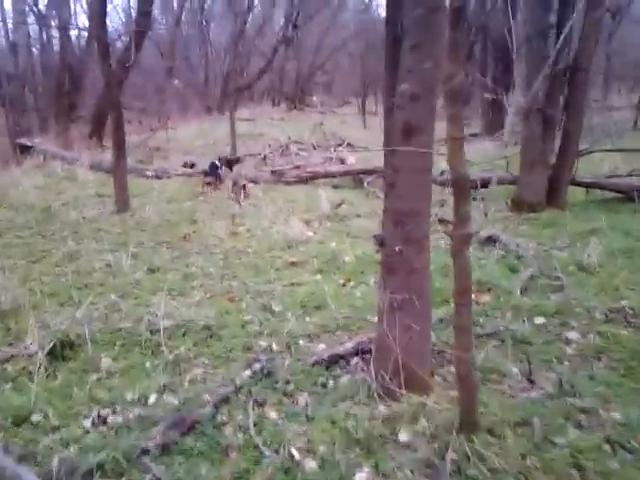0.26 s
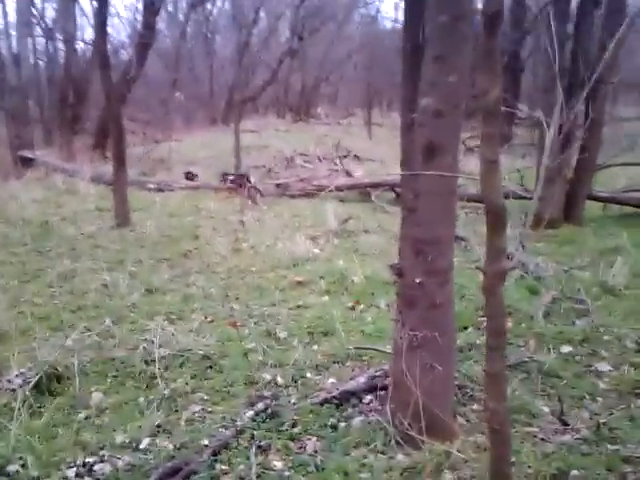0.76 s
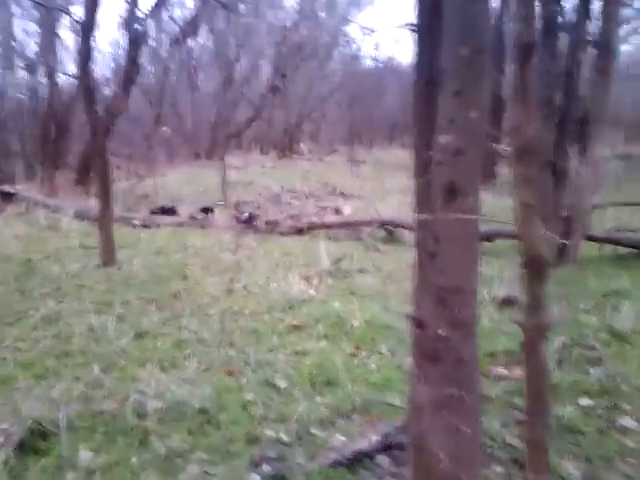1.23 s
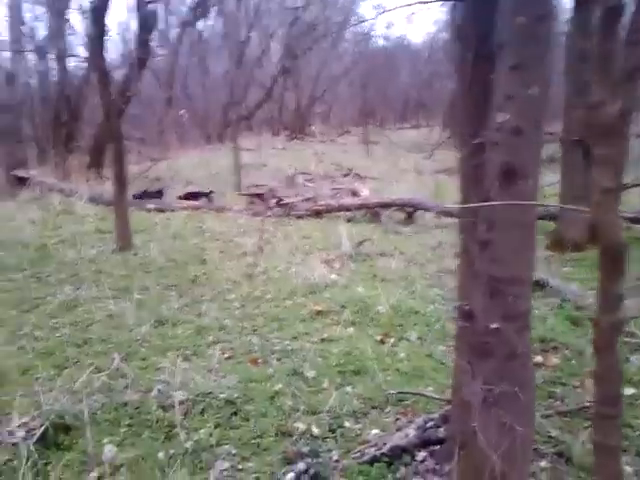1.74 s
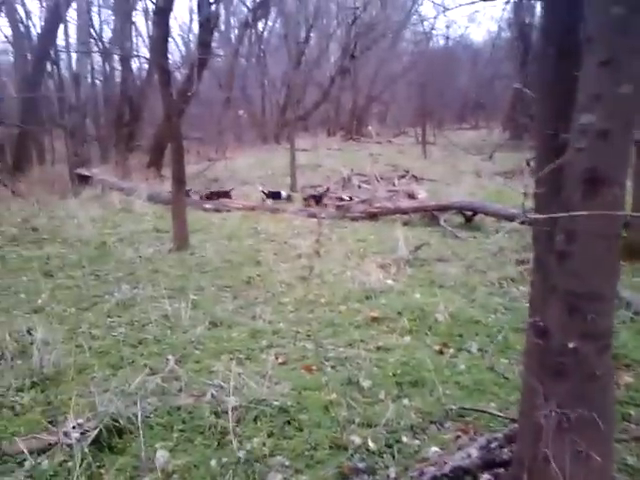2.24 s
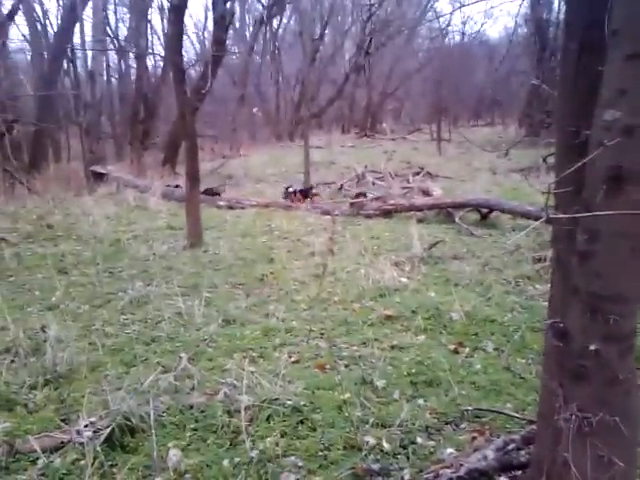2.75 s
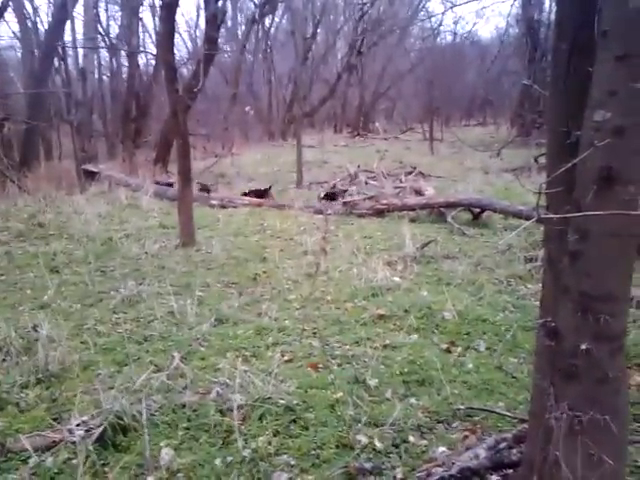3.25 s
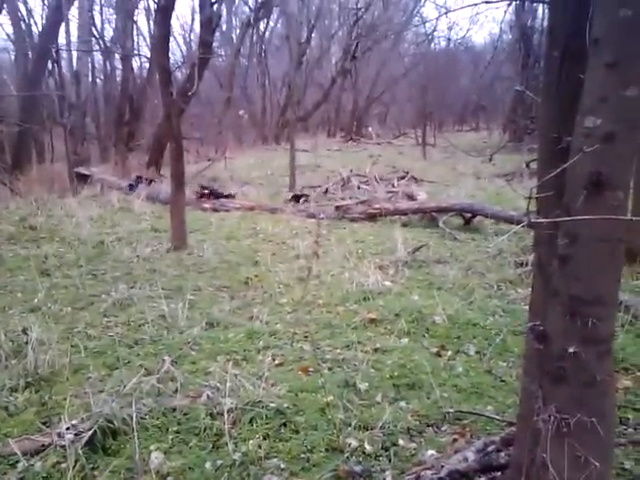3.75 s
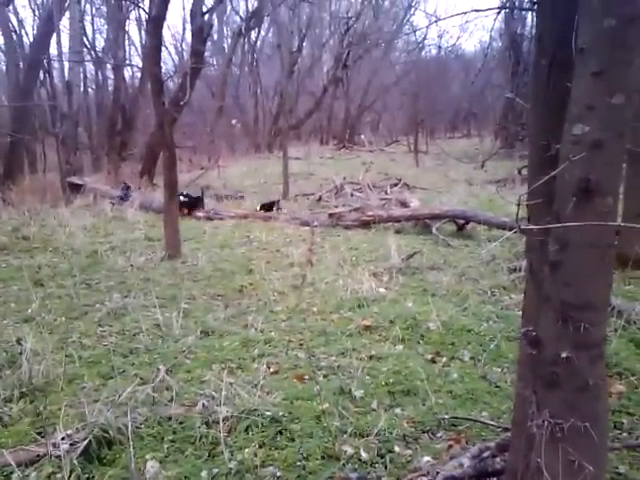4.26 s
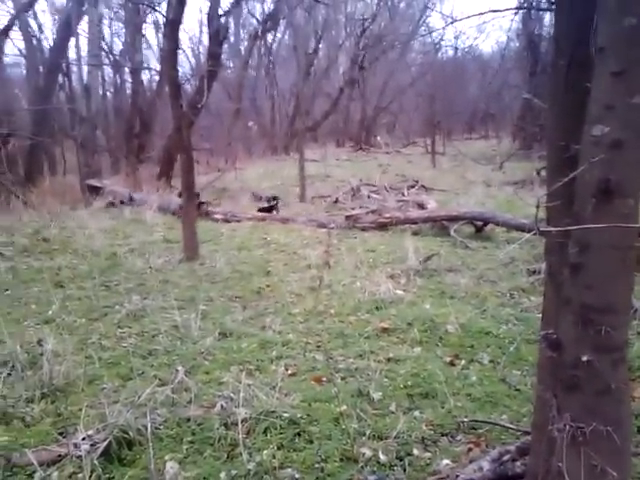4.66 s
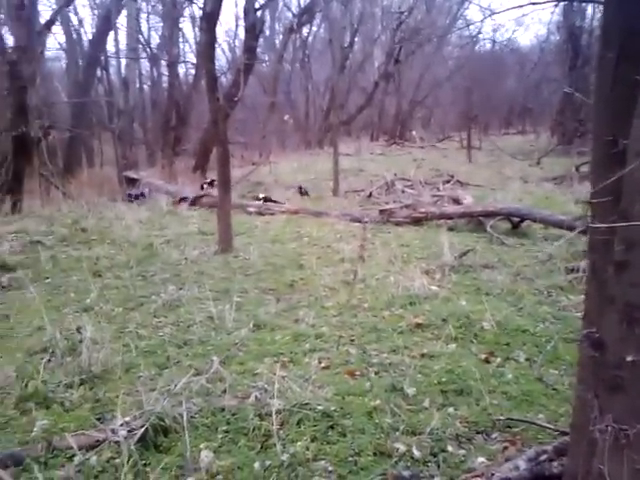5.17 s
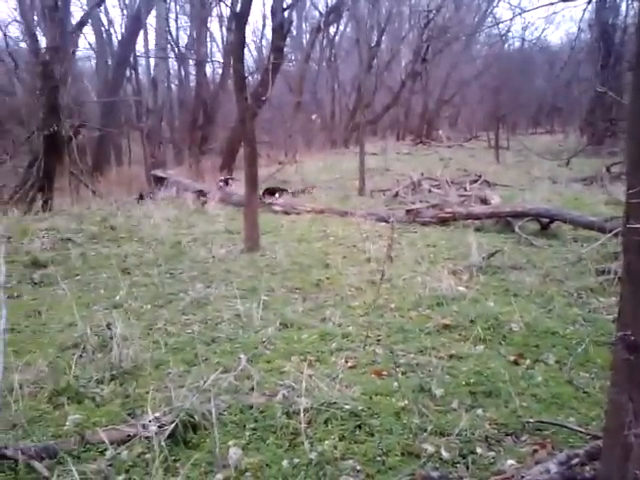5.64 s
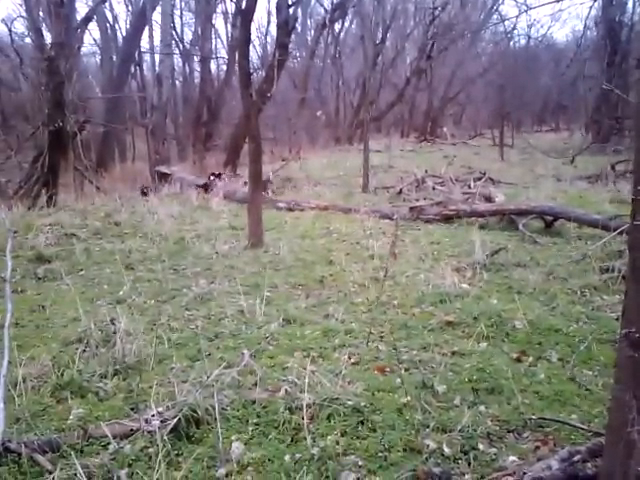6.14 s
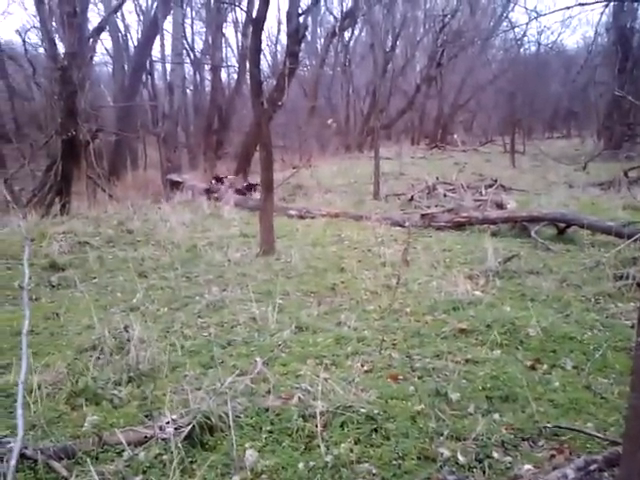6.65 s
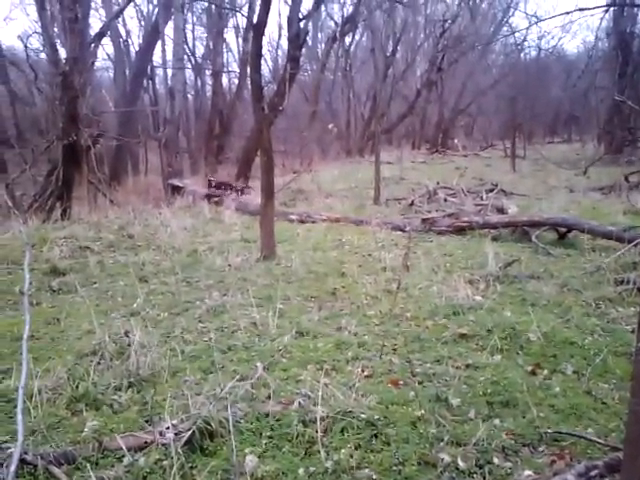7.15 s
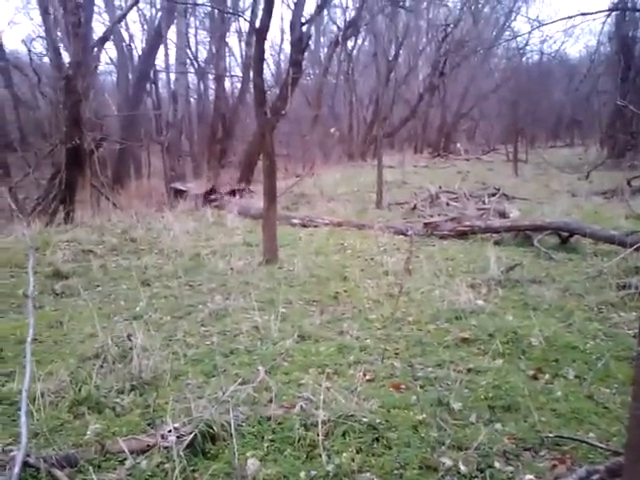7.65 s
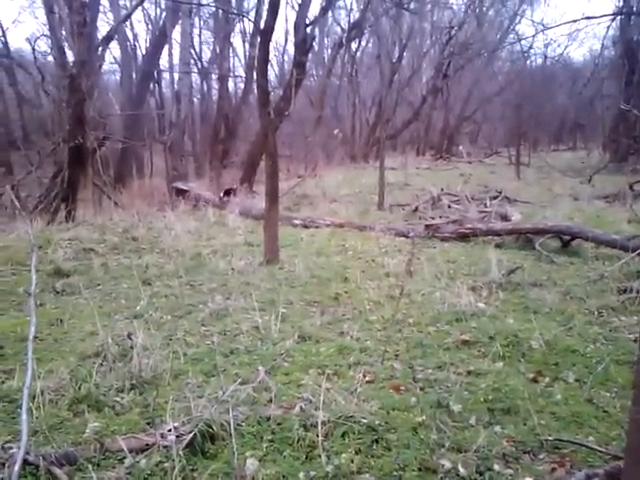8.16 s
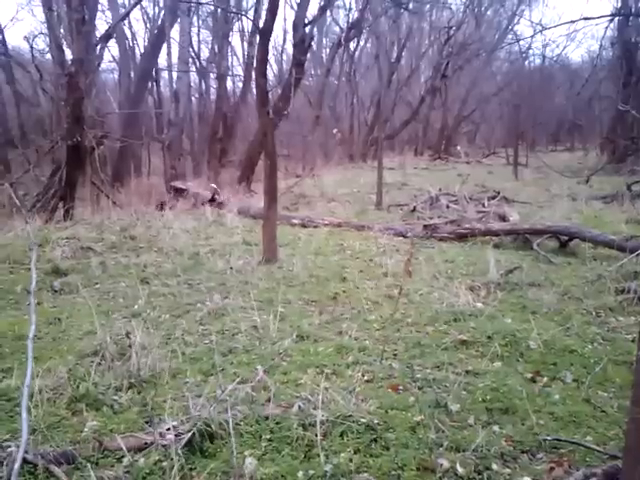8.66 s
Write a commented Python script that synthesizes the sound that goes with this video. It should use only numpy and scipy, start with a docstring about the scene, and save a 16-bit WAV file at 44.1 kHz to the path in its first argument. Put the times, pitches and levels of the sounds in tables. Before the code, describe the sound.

A pack of hounds calls some way off among bare trees. Yelps begin as clear high notes and crack into rasping barks, with brief squeals on top. It starts crowded, thins to separate barks, stretches into two drawn-out hoarse bays, then swells into the loudest volleys before thinning out and stopping. Faint wind rumble, slight leaf crackle and soft woodland echoes lie behind, on a simple, dull outdoor microphone.

```python
"""Open woodland, a pack of hounds giving tongue some way off.
Yelps start as clear harmonic notes and break into hoarse barks: uneven pulses and noise through resonances,
with wavering pitched cores. Squeals and long bays overlap them; noise echoes off trunks add a tail.
Behind: faint air, low rumble, crackling leaves. A microphone with little treble overloads on the loudest barks."""
import sys
import numpy as np
from scipy import signal
from scipy.fft import rfft, irfft
from scipy.io import wavfile

SR = 44100
rng = np.random.default_rng(int(sys.argv[2]) if len(sys.argv) > 2 else 0)


def materialize(psi):
    """Save the field psi as 16-bit PCM at rate SR to the path in sys.argv[1].

    A 1-D psi becomes a single channel; in a 2-D psi each row is a channel.
    """
    bounded = np.clip(np.atleast_2d(psi).T, -1, 1)
    quanta = np.round(bounded * 32767).astype(np.int16)
    wavfile.write(sys.argv[1], SR, quanta)


N = 392490

# Moving air on the microphone: t/s, level/dB (before RUMBLE_GAIN_DB)
RUMBLE_LEVELS = [(0.0, -50.5), (0.57, -47), (1.38, -54.5), (1.81, -45.5), (2.38, -67), (2.68, -59),
                 (5.06, -53), (6.64, -65), (6.79, -55), (7.09, -58), (8.9, -72.5)]
RUMBLE_GAIN_DB = -4
# Steady air, spectrum shape: f/Hz, relative density/dB per Hz
AIR_SPECTRUM = [(15, -29), (25, -19.5), (80, -7.5), (200, -7.5), (400, -12), (900, -10), (2000, -20.5),
                (4000, -24), (6500, -23.5), (7200, -11.5), (7800, -38.5)]
AIR_LEVEL_DB = -49.5
# Dry leaves stirred nearby: start t/s, length/s, level/dB (before LEAVES_GAIN_DB)
LEAF_SWELLS = [(0.0, .3, -48), (1.57, 0.25, -47)]
LEAVES_GAIN_DB, CRACKLES_PER_S = 5, 2500
# Tail scattered by the trunks: f/Hz, t60/s
TRUNK_DECAY = [(400, 1.3), (900, 1.26), (1500, 1.325), (3000, 0.92), (6000, 2.19)]
FIRST_TRUNK_S, TAIL_GAIN_DB = 0.028, -17.5

# Call times: swell/s, dying/s, scoop below the first pitch/%, fall below the last pitch/%
BAY_TIMES = (.045, .03, 5, 0)
SQUEAL_TIMES = (0.02, 0.028, 0.72, 0)
CORE_TIMES = (.02, .03, .3, .3)
YELP_SWELL_S, YELP_FALL_PERCENT = 0.013, 1.2
# Call shapes, a row per corner (start, swelled, hold end, end):
# 1st harmonic offset/dB, then extra drop of each higher harmonic below the 1st/dB
BAY_SHAPE = [(-19.5, -2.5, -8.5, -12.5), (2.5, 1.5, -4, -5.5), (-1, -1, 6.5, 6.5), (-10.5, -3, 4, 5.5)]
SQUEAL_SHAPE = [(-10.5, 4, 13), (-0.46, .3, -1), (0, 2.5, 10), (-12, 15, 30)]
YELP_SHAPE = [(-27, 17, 16, 10.5), (0, 16.5, 7, -5.5), (0, 0.5, -1, 0), (-9, 6, 8, 14)]
# Core edges: level at start/dB, at end/dB, relative to the hold
CORE_EDGES = (-7, -8)

# Levels and drops below are offset by the shapes above.
# Long bays: start t/s, length/s, from f/Hz, to f/Hz, last f/Hz, level/dB,
# 2nd, 3rd, 4th harmonic drop below the 1st/dB
BAY_CALLS = [ (0.07, 0.15, 528.4, 552, 540, -23.5, 14, 26.5, 28.5),
             (0.2, 0.15, 544, 527, 512, -25, 11.5, 34, 33.5),
             (0.386, 0.12, 584, 547, 545, -16, 12.5, 24.5, 29),
             (0.498, 0.12, 536.5, 535, 540, -27.5, -1.5, 15.5, 11.5),
             (0.597, .135, 571.3, 593, 603, -17.5, 13, 21, 33),
             (0.992, 0.13, 509, 587, 546, -52, -35, -8, -18.5),
             (4.305, 0.47, 588.2, 524.4, 505, -30, -9, -3, 4),
             (5.041, 0.42, 564.5, 510, 510, -33.5, -15, -4.5, 3), ]
# Squeals: start t/s, length/s, from f/Hz, to f/Hz, last f/Hz, level/dB, 2nd, 3rd harmonic drop/dB
SQUEAL_CALLS = [ (0.816, 0.059, 1365, 1393, 1396, -18.5, 7.3, 20),
                (1.325, .11, 1511, 1581, 1170, -13, 17, 27.5),
                (1.882, 0.07, 1305, 1323, 1260, -15.5, 22, 30.5),
                (2.644, 0.13, 1371, 1404, 1520, -22, 18, 36), (3.263, 0.12, 1349, 1288, 1187, -23, 12, 42),
                (3.732, .11, 1393, 1411, 1474, -23, 9, 18.5),
                (5.475, 0.14, 1568, 1545, 1420, -22, 34, 45.5),
                (5.966, 0.12, 1395, 1407, 1350, -14, 10.3, 29.5),
                (6.06, 0.12, 1372, 1401, 1472, -11.5, 8.9, 23.5),
                (6.163, .075, 1455, 1464, 1410, -16, 17, 33), (6.437, .06, 1395, 1430, 1410, -22, 3, 17),
                (7.01, 0.08, 1440, 1507, 1480, -13.5, 22, 46.5),
                (7.12, 0.059, 1495, 1480, 1160, -11.5, 17, 38),
                (7.67, 0.073, 1414, 1395, 1440, -19, 14, 20.5), ]
# Clear starts of yelps: dying/s, scoop/%, swell short by/dB, start t/s, length/s, from f/Hz, to f/Hz,
# level/dB, 2nd, 3rd, 4th harmonic drop/dB
YELP_CALLS = [ (0.028, 3.5, 1.5, 0.662, 0.049, 892, 902, -13.5, 10.5, 12, 26.5),
              (0.016, 3, 3, 1.173, 0.042, 877, 933, -9, 8.5, 10.14, 25),
              (0.038, 1, 4, 1.753, 0.078, 838, 819, -13.5, 19, 13.5, 34.5),
              (.024, -3, -4, 2.305, 0.036, 840, 768, -35.5, 25, 35, 43.5),
              (.014, -1.5, 2.5, 2.555, 0.045, 917, 910, -11, 15, 15.7, 37.5),
              (.014, 0, 3.5, 3.189, 0.044, 870, 910, -14.5, 10, 12, 29),
              (0.013, 5, 5.5, 3.58, 0.045, 830, 888, -16, 13.5, 18, 36.5),
              (.011, 3, -1.5, 5.808, .03, 850, 866, -19, -5, 4.4, 16.5),
              (0.014, 2.5, 6, 7.55, 0.047, 847, 909, -12, 7, 12, 18),
              (0.044, 5, 2, 8.041, 0.072, 890, 917, -21.5, 40, 25.6, 25.5), ]
# Pitched cores of the barks: start t/s, length/s, from f/Hz, to f/Hz, early level/dB, late level/dB
BARK_CORES = [ (0.358, .05, 698, 687, -25, -29), (0.479, .14, 632, 701, -23, -19),
              (0.72, 0.17, 865, 850.7, -28, -24), (1.208, .132, 937, 946, -13.5, -21),
              (1.825, .145, 805, 798, -17, -28), (2.598, 0.09, 869, 847, -20, -21),
              (2.623, 0.12, 688, 690, -29, -28.5), (3.224, .116, 852, 851, -18, -24),
              (3.654, 0.15, 683.3, 692.5, -30, -29), (3.638, 0.14, 826, 864, -25.5, -22.5),
              (4.559, .25, 744.3, 750, -24, -19), (5.051, 0.11, 734, 702, -20.5, -21),
              (5.23, .2, 727, 736, -25, -17), (5.425, .135, 1045, 1028, -17, -21),
              (5.84, .16, 880, 867, -15.5, -18), (5.855, .175, 713, 693, -19.5, -23),
              (6.394, .12, 664.5, 688, -24, -14), (6.485, .155, 862, 852.6, -14, -15),
              (6.535, .125, 1112, 1068, -15, -16), (6.951, 0.13, 705, 688, -28, -9.5),
              (7.045, .085, 1078, 1094, -12, -12.5), (7.58, .18, 890, 877.6, -11, -16),
              (7.595, .105, 1172, 1144, -20.5, -29), ]

# Hoarse barks: start t/s, peak after/s, length/s, first burst, peak, late level/dB (before BARK_GAIN_DB),
# open mouth at start, end/dB, snarl at start, end/dB
HOARSE_BARKS = [ (0, 0.04, 0.4, -25.5, -23.5, -28, -9.5, -15.5, -13.5, -23),
                (0.346, .075, .15, -20, -12.5, -16, -2.5, -12, -5.5, -27.5),
                (0.47, .09, 0.24, -20.5, -19, -16, -13.5, -6.5, -24.5, -19),
                (0.66, .06, 0.24, -12, -11.5, -12, -18.5, -9, -14.5, -14.5),
                (0.86, .1, 0.28, -17, -16.5, -17.5, -13.5, -1.5, -17.5, -14),
                (1.199, 0.12, 0.2, -16.5, -13, -15, -1.5, -2.2, -3, -7.5),
                (1.79, 0.12, 0.23, -17.5, -21.5, -20.5, -8, 3.7, -12, -4.5),
                (2.588, 0.13, 0.21, -20, -18, -21, -3.5, 4, -1.5, -8.5),
                (3.22, 0.087, 0.19, -19.5, -19.5, -21, -7, 2.5, 1.5, -5),
                (3.618, 0.081, 0.23, -17.5, -19.5, -22, -19.5, 4, -8, -8.5),
                (4.301, 0.073, 0.55, -18.5, -15, -17.5, 0.5, -5, -8, -22),
                (5.036, 0.078, 0.46, -15.5, -14, -18.5, 0.1, -7, -13, -26),
                (5.398, 0.11, 0.23, -13.5, -8, -13.5, -2, -3, 0.5, -21),
                (5.815, 0.097, 0.4, -10.5, -5.5, -13.5, -3, -3, -7, -20.5),
                (6.402, .14, .34, -14.5, -5, -9, 0.5, -5.5, -11, -18.5),
                (6.947, 0.16, .27, -11.5, -4.5, -9, -0.9, -7.5, -9.5, -15.5),
                (7.568, 0.1, 0.22, -13, -10.5, -13, 3, -2.5, -3, -18.5), ]
BARK_GAIN_DB, BREATH_DB = -4, -34
BARK_BURST_S, BARK_DYING_S = 0.036, 0.1
BARK_START_DB, BARK_END_DB = -9, -9   # relative to the first burst; to the late level
# Resonances of throat, open mouth, snarl, breath: f/Hz, single-pass width/Hz, level/dB
THROAT_MODES = [(356, 570, -23.5), (650, 240, 4), (908.4, 320, 9.5)]
MOUTH_MODES = [(1109, 418, 8.5), (1476, 544, 8.5)]
SNARL_MODES = [(2205, 740, 5), (2910, 250, -0.5), (3183, 210, -5.5), (3583, 224, -12.5)]
BREATH_MODES = [(4300, 200, -31.5), (6200, 2700, -35.5)]

MIC_TOP_HZ, CUTOFF_HZ = 8250, 15800
MIC_OFFSET = 0.0024   # full scale = 1


def from_db(db):
    """Decibels to amplitude gain."""
    return 10 ** (np.asarray(db) / 20)


def rms_one(x):
    """Scale to unit rms."""
    return x / np.sqrt(np.mean(x ** 2) + 1e-20)


def at_hz(points, hz):
    """Read a spectrum table on a log-frequency axis."""
    table_hz, values = np.transpose(points)
    return np.interp(np.log(hz), np.log(table_hz), values)


def band_noise(x, order, low_hz, high_hz):
    """Band-pass x (Butterworth)."""
    sos = signal.butter(order, [low_hz, high_hz], "band", fs=SR, output="sos")
    return signal.sosfilt(sos, x)


def drift(rate_hz):
    """Slow chance: noise twice through a one-pole low-pass, rms 1."""
    r = np.exp(-2 * np.pi * rate_hz / SR)
    settle = 4000
    noise = rng.standard_normal(N + settle)
    return rms_one(signal.lfilter([1], [1, -2 * r, r * r], noise)[settle:])


def span(rows, attack_s, release_s):
    """Sample range of corner rows, a fade at both ends, and the columns at sample rate."""
    s, *columns = np.transpose(rows)
    first, last = round(s[0] * SR), min(round(s[-1] * SR), N)
    t = np.arange(first, last) / SR
    fade = np.clip(np.minimum((t - s[0]) / attack_s, (s[-1] - t) / release_s), 0, 1)
    return slice(first, last), fade, [np.interp(t, s, c) for c in columns]


def rumble():
    """Lumpy low noise from moving air."""
    low = rms_one(band_noise(rng.standard_normal(N), 2, 30, 200))
    s, level_db = np.transpose(RUMBLE_LEVELS)
    level_db = np.interp(np.arange(N) / SR, s, level_db)
    lumps_db = 3 * drift(2.4)
    return from_db(level_db + RUMBLE_GAIN_DB + lumps_db) * low


def air():
    """Far, steady air and microphone hiss: noise shaped in the spectrum."""
    hz = np.maximum(np.fft.rfftfreq(N, 1 / SR), 10)
    spectrum = rfft(rng.standard_normal(N)) * from_db(at_hz(AIR_SPECTRUM, hz))
    return from_db(AIR_LEVEL_DB) * rms_one(irfft(spectrum, N))


def leaves():
    """Dense small crackles, broad and bright: random impulses in soft swells."""
    grains = (rng.random(N) < CRACKLES_PER_S / SR) * rng.standard_normal(N)
    grains = rms_one(band_noise(grains, 1, 250, 6000))
    t = np.arange(N) / SR
    swells = np.zeros(N)
    for start, length, level_db in LEAF_SWELLS:
        arch = np.sin(np.pi * np.clip((t - start) / length, 0, 1)) ** 2
        swells += from_db(level_db + LEAVES_GAIN_DB) * arch
    return grains * swells


def woodland(x):
    """Countless weak echoes off trunks: noise that swells after the first trunk and dies band by band."""
    t = np.arange(2 * SR) / SR
    edges_hz = 280 * 2 ** np.arange(0, 5, .5)
    echoes = np.zeros(len(t))
    for low, high in zip(edges_hz, edges_hz[1:]):
        band = band_noise(rng.standard_normal(len(t)), 2, low, high)
        echoes += band * from_db(-60 * t / at_hz(TRUNK_DECAY, np.sqrt(low * high)))
    echoes *= np.clip(t / FIRST_TRUNK_S - 1, 0, 1)
    # normalise the echo energy for the band covered
    energy = np.sum(echoes ** 2) * np.mean(edges_hz[[0, -1]]) * 4 / SR
    return signal.fftconvolve(x, .5 * echoes / np.sqrt(energy))[:N]


def voice(notes, jitter_rad, shimmer, rate_hz, release_s):
    """Harmonics on a pitch; cycles uneven in timing (jitter), each harmonic swelling and fading (shimmer)."""
    out, timing = np.zeros(N), drift(rate_hz)
    strength = [np.tanh(drift(rate_hz)) for _ in range(4)]
    for rows in notes:
        s, hz, *levels_db = np.transpose(rows)
        corners = np.transpose([s, hz, *from_db(levels_db)])
        at, fade, (hz, *heights) = span(corners, 0.004, release_s)
        phase = 2 * np.pi * np.cumsum(hz) / SR + jitter_rad * timing[at]
        for k, height in enumerate(heights):
            swell = 1 + shimmer * strength[k][at]
            out[at] += np.sqrt(2) * fade * height * swell * np.cos((k + 1) * phase)
    return out


def call(times, shape_db, start, length, from_hz, to_hz, last_hz, level_db, *drops_db):
    """Corners of one call: rows (t/s, f/Hz, level/dB of each harmonic)."""
    swell, dying, scoop, fall = times
    s = start + np.array([0, min(swell, .45 * length), length - min(dying, .54 * length), length])
    hz = [from_hz * (1 - scoop / 100), from_hz, to_hz, last_hz * (1 - fall / 100)]
    offset_db, *extra_db = np.transpose(shape_db)
    first_db = level_db + offset_db
    higher_db = [first_db - drop - extra for drop, extra in zip(drops_db, extra_db)]
    return np.transpose([s, hz, first_db, *higher_db])


def bays():
    """Long notes with strong jitter and shimmer."""
    return voice([call(BAY_TIMES, BAY_SHAPE, *row) for row in BAY_CALLS], .32, .6, 40, .02)


def squeals():
    """Short high notes of up to three harmonics."""
    return voice([call(SQUEAL_TIMES, SQUEAL_SHAPE, *row) for row in SQUEAL_CALLS], .17, .4, 50, .015)


def yelp(dying, scoop, short_db, start, length, from_hz, to_hz, *levels_db):
    """Corners of one yelp; its swell stops short by short_db and the level moves on through the hold."""
    shape_db = np.array(YELP_SHAPE, float)
    shape_db[:2, 0] -= short_db
    times = (YELP_SWELL_S, dying, scoop, YELP_FALL_PERCENT)
    return call(times, shape_db, start, length, from_hz, to_hz, to_hz, *levels_db)


def yelps():
    """Clear starts: four nearly steady harmonics."""
    return voice([yelp(*row) for row in YELP_CALLS], .04, .05, 60, .006)


def core(start, length, from_hz, to_hz, early_db, late_db):
    """Corners of one pitched core, a single harmonic."""
    start_db, end_db = CORE_EDGES
    shape_db = [(early_db + start_db,), (early_db,), (late_db,), (late_db + end_db,)]
    return call(CORE_TIMES, shape_db, start, length, from_hz, to_hz, to_hz, 0)


def cores():
    """Wavering pitch inside the barks: single harmonics with heavy jitter and shimmer."""
    return voice([core(*row) for row in BARK_CORES], .6, .6, 35, .015)


def folds(pulse_hz, wander=.06, scatter=.05, size_db=1.5):
    """One pulse train: rate wanders slowly and scatters fast, sizes are uneven."""
    rate_hz = pulse_hz * np.exp(wander * drift(6) + scatter * drift(200))
    cycles = np.cumsum(rate_hz) / SR
    pulses = np.diff(np.floor(cycles), prepend=0) > 0
    return rms_one(pulses * from_db(size_db * rng.standard_normal(N)))


def resonances(x, modes):
    """Parallel resonances with alternating signs, each applied twice for dark valleys; rms 1."""
    out = np.zeros(len(x))
    for k, (hz, width_hz, level_db) in enumerate(modes):
        r = np.exp(-np.pi * width_hz / SR)
        b = np.array([1, 0, -1]) * (1 - r * r) / 2
        a = [1, -2 * r * np.cos(2 * np.pi * hz / SR), r * r]
        ringing = signal.lfilter(b, a, signal.lfilter(b, a, x))
        out += (-1) ** k * from_db(level_db) * ringing
    return rms_one(out)


def bark(start, peak, length, burst_db, peak_db, late_db, open_db, open_end_db, snarl_db, snarl_end_db):
    """Corners of one bark: rows (t/s, level/dB, open mouth/dB, snarl/dB)."""
    late_s = max(length - BARK_DYING_S, 1.1 * peak)
    s = np.array([0, min(BARK_BURST_S, .8 * peak), peak, late_s, length])
    level_db = [burst_db + BARK_START_DB, burst_db, peak_db, late_db, late_db + BARK_END_DB]
    done = s / length
    mouth_db = open_db + (open_end_db - open_db) * done
    return np.transpose([start + s, level_db, mouth_db, snarl_db + (snarl_end_db - snarl_db) * done])


def hoarse_barks():
    """Vocal folds slapping unevenly at a fraction of the clear pitch, with air noise, ring throat and mouth."""
    pulses = folds(440) + folds(345) + folds(570)
    source = pulses + .35 * rng.standard_normal(N)
    throat, mouth, snarl = (resonances(source, modes) * from_db(1.3 * drift(18))
                            for modes in (THROAT_MODES, MOUTH_MODES, SNARL_MODES))
    breath = from_db(BREATH_DB) * resonances(rng.standard_normal(N), BREATH_MODES)
    out = np.zeros(N)
    for row in HOARSE_BARKS:
        at, fade, (level_db, open_db, snarl_db) = span(bark(*row), 0.011, 0.048)
        # throat takes the power the open mouth does not carry
        closed = np.sqrt(np.clip(1 - from_db(2 * open_db), .05, 1))
        body = closed * throat[at] + from_db(open_db) * mouth[at]
        body += from_db(snarl_db) * snarl[at] + breath[at]
        out[at] += fade * from_db(level_db + BARK_GAIN_DB) * body
    return out


def scene():
    """The pack and its echoes over air, rumble and leaves."""
    background = air() + rumble() + leaves()
    pack = bays() + squeals() + yelps() + cores() + hoarse_barks()
    tail = from_db(TAIL_GAIN_DB) * woodland(pack)
    return (background + tail + pack)[None]


def record(dry):
    """Microphone loses the treble, a small offset is added, full scale clips, a last low-pass follows."""
    mic = signal.cheby2(10, 60, MIC_TOP_HZ, fs=SR, output="sos")
    heard = signal.sosfilt(mic, dry) + MIC_OFFSET
    top = signal.cheby2(12, 70, CUTOFF_HZ, fs=SR, output="sos")
    return signal.sosfilt(top, np.clip(heard, -1, 1))


dry = scene()
out = record(dry)
materialize(out)
```